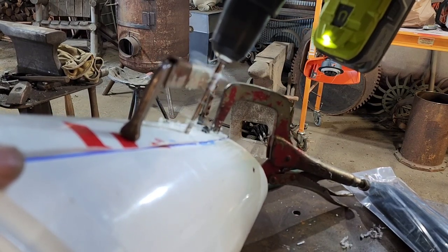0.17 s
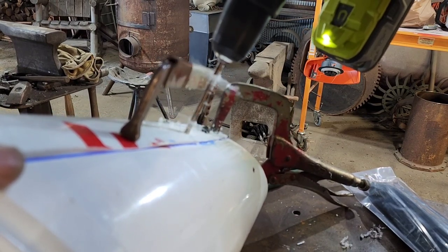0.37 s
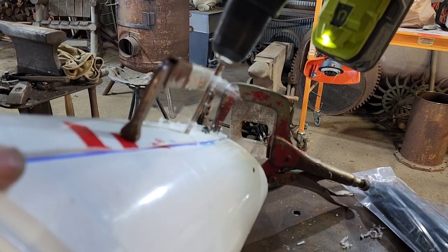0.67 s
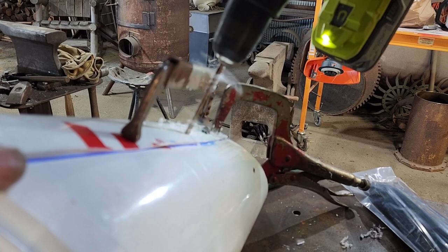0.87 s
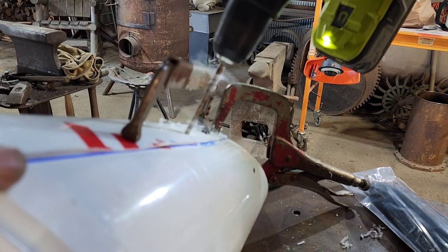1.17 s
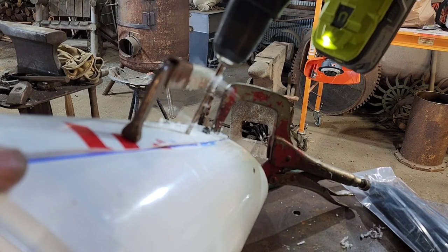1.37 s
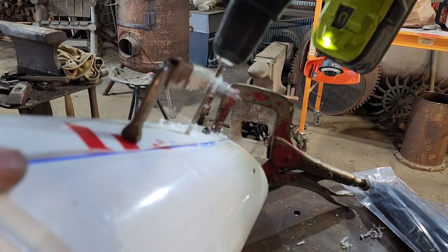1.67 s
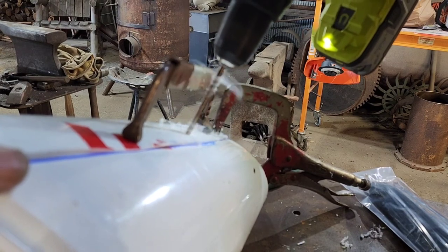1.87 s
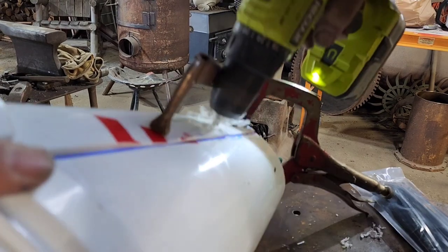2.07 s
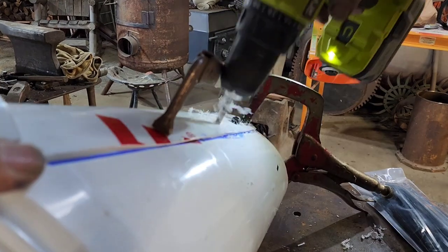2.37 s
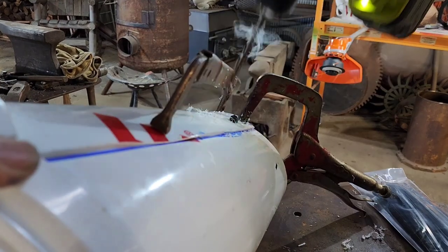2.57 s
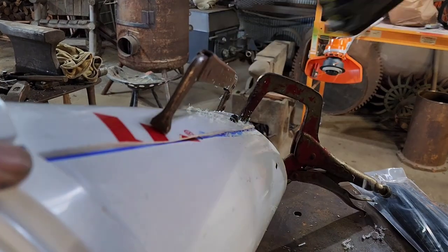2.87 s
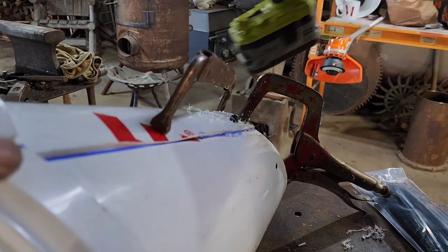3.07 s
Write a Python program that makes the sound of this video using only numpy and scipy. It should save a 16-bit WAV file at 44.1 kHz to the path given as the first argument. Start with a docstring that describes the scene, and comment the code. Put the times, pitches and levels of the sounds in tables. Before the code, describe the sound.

Drill motor hisses and whines steadily, rasps and squeals in plastic, then halts with a sharp knock.

```python
"""A cordless drill runs flat out in a workshop: pulsing motor hiss, gear whine, a rattle swelling once a turn.
At about 2.1 s the bit pushes through a hollow plastic shell; the chuck bumps, rubs and squeals, the whine sags.
From 2.55 s the flutes rasp and squeak as the bit is drawn out; at 2.8 s the spindle lock knocks to a stop.
The knock rings in the room, then a faint scuff. Lines are sines or narrow noise, the rest is coloured noise and modes."""
import sys
import numpy as np
from scipy import signal
from scipy.fft import rfft, irfft, next_fast_len
from scipy.io import wavfile
from scipy.ndimage import uniform_filter1d, map_coordinates

SR = 44100
rng = np.random.default_rng(int(sys.argv[2]) if len(sys.argv) > 2 else 0)


def waveform_to_disk(signal):
    """Save audio, clipped to [-1, 1], as 16-bit WAV at the path in sys.argv[1]."""
    frames = np.transpose(np.atleast_2d(signal))
    scaled = np.clip(frames, -1, 1) * 32767
    samples = np.round(scaled).astype(np.int16)
    wavfile.write(sys.argv[1], SR, samples)


N = 141120
WHINE_PER_TURN = 132  # whine cycles per spindle turn
STOP_S = 2.815

# gear train tones: (multiple of spindle speed [1])
GEAR_ORDERS = [1, 3, 6, 12, 13, 64.5, 72, 75, 90.5]
# plastic shell modes: (frequency [Hz], relative level [dB], t60 [s])
SHELL_MODES = [(268, -18, 0.03), (328, 1, 0.095), (360, 0, 0.09), (388, 1, 0.095), (452, -9, 0.05),
               (810, -11, 0.027), (1250, -6, .02), (1730, -10, 0.03)]


def amp(db):
    """Decibels to gain."""
    return 10 ** (np.asarray(db) / 20)


def unit(x):
    """Scaled to rms 1."""
    return x / np.sqrt(np.mean(x ** 2) + 1e-20)


def along(points, hz):
    """(Hz, value) points read on a log frequency axis."""
    f, v = np.transpose(points)
    return np.interp(np.log(hz + 1), np.log(f + 1), v)


def curve(rows, axis=1):
    """One column of a time table, sample by sample."""
    rows = np.array(rows)
    return np.interp(np.arange(N) / SR, rows[:, 0], rows[:, axis])


def wobble(rate_hz):
    """A smooth random curve, rate_hz knots a second."""
    return map_coordinates(rng.standard_normal(8192), [np.arange(N) * rate_hz / SR], mode="wrap")


def filtered(x, response):
    """x times a response of frequency."""
    m = next_fast_len(N + SR // 2)
    return irfft(rfft(x, m) * response(np.fft.rfftfreq(m, 1 / SR)), m)[..., :N]


def spread(pair, colour):
    """Two unrelated signals as coloured stereo of rms 1, mixed as mid and side."""
    # (frequency [Hz], left-right likeness [-1 to 1])
    likeness = [(60, 0.98), (250, 0.88), (500, 0.46), (1500, 0.4), (2500, 0.094), (5000, 0.12),
                (8000, -0.063), (14000, -0.085)]

    def mid_side_gains(hz):
        angle = np.arccos(np.clip(along(likeness, hz), -1, 1)) / 2
        return amp(along(colour, hz)) * np.array([np.cos(angle), np.sin(angle)])

    mid, side = filtered(pair, mid_side_gains)
    return unit(np.array([mid + side, mid - side]))


def noise():
    """Two unrelated white noises."""
    return rng.standard_normal((2, N))


def worn(turns, share, size=512):
    """Roughness of which a share repeats with every turn."""
    track = rng.standard_normal((2, size))
    again = np.array([map_coordinates(row, [turns % 1 * size], mode="grid-wrap") for row in track])
    share = np.clip(share, 0, 1)
    return np.sqrt(share * size * turns[-1] / N) * again + np.sqrt(1 - share) * noise()


def ring(modes, scatter_db, fuzz_hz):
    """One strike on a set of decaying modes, each blurred over fuzz_hz."""
    t = np.arange(SR // 3) / SR
    out = np.zeros(len(t))
    for hz, db, t60 in modes:
        level = amp(db + scatter_db * rng.normal() - 60 * t / t60)
        blur = np.sqrt(2 * np.pi * fuzz_hz / SR) * np.cumsum(rng.standard_normal(len(t)))
        out += level * np.cos(2 * np.pi * hz * t + blur)
    return out


def add(out, s, sound):
    """Mix a sound in at a time."""
    part = out[..., round(s * SR):][..., :sound.shape[-1]]
    part += sound[..., :part.shape[-1]]


def tone(cycles, drift, apart):
    """A slightly unsteady line of rms 1 with its own phase in each ear."""
    phase = 2 * np.pi * cycles + drift * wobble(24.94)
    return np.sqrt(2) * np.sin([phase + apart, phase - apart])


def narrow(cycles, width_hz):
    """A fuzzy line of rms 1: noise in a narrow band, unrelated between the ears."""
    blur = np.array([wobble(width_hz) + 1j * wobble(width_hz) for ear in range(2)])
    return unit((blur * np.exp(2j * np.pi * cycles)).real)


def air():
    """The quiet air of the room: steady coloured noise."""
    # (frequency [Hz], relative level [dB per Hz])
    colour = [(25, -10.5), (130, 1), (450, -10.5), (850, -18), (1800, -21), (5000, -24), (12000, -38.5)]
    return amp(-57) * spread(noise(), colour)


def workshop(x):
    """The room's tail: decaying noise, each frequency dying at its own speed."""
    # (frequency [Hz], t60 [s])
    decay = [(100, 0.17), (400, 0.47), (2000, 0.39), (6000, 0.34), (15000, 0.29)]
    hz, t, z = signal.stft(rng.standard_normal((2, SR * 2 // 3)), SR, nperseg=256)
    z = z * amp(-60 * t / along(decay, hz)[:, None])
    tail = signal.istft(z, SR, nperseg=256)[1]
    return signal.fftconvolve(x, tail / np.linalg.norm(tail[0]), axes=1)[:, :N]


def handling():
    """A faint scuff, noise with a rough level, as the drill is lifted away."""
    level_db = curve([(2.98, -86), (3.045, -50), (3.085, -56.5), (3.125, -73), (3.2, -76.5)])
    colour = [(60, -5.0), (300, 2.5), (700, -10), (1700, -6.5), (4000, -17), (12000, -25)]
    return amp(level_db) * spread(noise() * amp(3.1 * wobble(210)), colour)


def brake():
    """The spindle lock chatters, slams home and rebounds, ringing the chuck and jolting the shell."""
    # lock strikes: (time [s], relative level [dB])
    strikes = [(2.807, -13), (2.812, -13), (2.817, -13.5), (2.822, -17), (2.826, -8), (2.836, -25),
               (2.841, -22), (2.851, -22)]
    # chuck modes: (frequency [Hz], relative level [dB], t60 [s])
    chuck_modes = [(1580, -14, 0.035), (1760, -15, .04), (4215, -18, 0.025), (4780, -19, 0.025),
                   (5420, -14, 0.14), (5600, -17, .14), (6050, -22.5, .1), (6800, -25, 0.03),
                   (8376, -18, 0.03)]
    # jolted shell: (frequency [Hz], relative level [dB], t60 [s])
    thud_modes = [(60.5, -2.5, 0.18), (128, -3.5, 0.27), (282, -1.5, 0.33)]
    # (frequency [Hz], relative level [dB per Hz])
    crack_colour = [(200, -17), (1000, -21), (1700, 4.5), (2800, 2), (5500, 1.5), (8500, 4), (10500, -3.5),
                    (14000, 2.5)]
    crack_offset_db, chuck_offset_db, thud_db = 1.5, 1, -30
    cracks, rings, t = np.zeros((2, N)), np.zeros((2, N)), np.arange(SR // 10) / SR
    for s, db in strikes:
        add(cracks, s, amp(db + crack_offset_db - 60 * t / 0.018))
        chuck = np.array([ring(chuck_modes, scatter_db=3.0, fuzz_hz=160) for ear in range(2)])
        add(rings, s, amp(db + chuck_offset_db) * chuck)
    add(rings, STOP_S, amp(thud_db) * ring(thud_modes, scatter_db=6.5, fuzz_hz=7.1))
    return cracks * spread(noise(), crack_colour) + rings


def bumps():
    """Each bump of the chuck cracks briefly and rings the shell."""
    # (time [s], relative level [dB], crack re bump [dB])
    hits = [(2.087, -6, -7), (2.158, -6.5, -13), (2.166, -8.5, -14), (2.282, -11.5, -10), (2.32, -17, -14),
            (2.398, -18, -7), (2.429, -21, -7.5), (2.552, -14.5, -6), (2.571, -14, -6.5),
            (2.625, -23.5, -11), (2.679, -16.5, -5), (2.723, -16, -7.5)]
    # (frequency [Hz], relative level [dB per Hz])
    crack_colour = [(150, -13), (300, 3), (1200, -7.5), (2000, 1.5), (3000, -10), (12000, -34)]
    cracks, rings, t = np.zeros(N), np.zeros(N), np.arange(SR // 10) / SR
    for s, db, crack_db in hits:
        onset = 1 - np.exp(-t / 0.0009)
        add(cracks, s, amp(db + crack_db - 60 * t / 0.078) * onset)
        add(rings, s, amp(db - 12.5) * ring(SHELL_MODES, scatter_db=1, fuzz_hz=10))
    return cracks * spread(noise(), crack_colour) + rings


def slide(rows, width_hz):
    """A fuzzy friction tone gliding along (s, Hz, dB) rows."""
    return amp(curve(rows, axis=2)) * narrow(np.cumsum(curve(rows)) / SR, width_hz)


def squeal():
    """Friction tones: the chuck bearing down, the flutes sliding on the rim in rough bursts."""
    # chuck nose on plastic: (time [s], frequency [Hz], level [dB])
    chuck_rows = [(2.26, 1732, -50), (2.33, 1754, -27), (2.41, 1785, -25.5), (2.45, 1870, -26),
                  (2.5, 1830, -26), (2.54, 1880, -57)]
    # flutes on the rim, one list per squeak: (time [s], frequency [Hz], level before bursts [dB])
    squeak_rows = [
        [(2.18, 1000, -59), (2.205, 891, -27), (2.23, 806, -32.5), (2.3, 780, -39.5), (2.42, 790, -40.5),
         (2.5, 767, -59.5)],
        [(2.57, 884, -52), (2.6, 995, -32), (2.625, 1196, -29), (2.645, 1420, -28), (2.67, 1640, -28),
         (2.69, 1640, -58)],
        [(2.66, 1251, -47.5), (2.68, 1285, -27), (2.7, 1412, -20.5), (2.718, 1162, -21), (2.73, 1116, -31),
         (2.745, 1080, -70)],
    ]
    bursts = unit(amp(2 * wobble(200)))
    squeaks = sum(slide(rows, width_hz) for rows, width_hz in zip(squeak_rows, [70, 90, 260]))
    return slide(chuck_rows, width_hz=110) + bursts * squeaks


def rubbing():
    """The chuck presses on the plastic: rough noise over the chuck's own ring."""
    # (time [s], pressure [0-1])
    press = [(2.08, 0.37), (2.17, 0.5), (2.25, 0.36), (2.33, 0.92), (2.47, 0.77), (2.56, 0.44), (2.6, 0.04)]
    # (frequency [Hz], relative level [dB per Hz])
    colour = [(200, -7), (550, -22), (800, -3.5), (1200, -4), (1800, 2.5), (2500, 0), (3400, -15.5),
              (4200, 5.5), (5500, -6.5), (9000, -24), (15000, -34.5)]
    # chuck ring: (frequency [Hz], width [Hz], level at full pressure [dB])
    chuck_lines = [(4250, 450, -34), (5570, 130, -29.5), (8380, 200, -35.5)]
    rub = amp(-20.5) * spread(noise() * amp(4.6 * wobble(120)), colour)
    bite = sum(amp(db) * narrow(hz * np.arange(N) / SR, width_hz) for hz, width_hz, db in chuck_lines)
    return curve(press) * (rub + bite)


def shaking():
    """The shell shaken by the chuck: low noise."""
    # (time [s], level [dB])
    level_db = [(2.06, -82), (2.11, -35), (2.19, -23), (2.235, -37), (2.3, -30.5), (2.47, -33.5),
                (2.54, -42.5), (2.8, -49)]
    # (frequency [Hz], relative level [dB per Hz])
    colour = [(20, -19), (45, -12), (70, 5), (100, -1), (130, 7), (165, 0), (215, -11), (500, -31.5)]
    return amp(curve(level_db)) * spread(noise(), colour)


def rasp(turns):
    """The bit slips on the rim as each jaw comes round, and the shell wall chatters."""
    # flutes catching the rim: (time [s], strength [0-1])
    catch_rows = [(2.08, 0), (2.11, .3), (2.2, .35), (2.24, .12), (2.28, .5), (2.45, .65), (2.48, .35),
                  (2.545, .35), (2.555, 1), (2.728, 1), (2.74, .27), (2.8, .11)]
    jaws, rasp_db = 3, -18.8
    chatter_limit = .6  # how far the rim evens out the wall's swing (0-1)
    catch = curve(catch_rows)
    slips = np.diff(np.floor(jaws * turns + .24 * wobble(70)), prepend=0)
    grind = .03 * noise()
    shell = ring(SHELL_MODES, scatter_db=1, fuzz_hz=0)
    wall = unit(signal.fftconvolve(slips + grind, shell[None], axes=1)[:, :N])
    swing = np.abs(uniform_filter1d(wall ** 2, size=300, axis=1)) + .01
    chatter = unit(wall / swing ** (chatter_limit / 2))
    # a light touch grips once a turn
    stutter = amp(2.4 * np.clip(1.3 - catch, 0, 1) * np.sin(2 * np.pi * turns))
    return amp(rasp_db) * np.clip(catch, 0, 1) * stutter * chatter


def motor_hiss(turns):
    """Vent noise pulsing with the rotor; its colour shifts as the drill drops and turns its vents."""
    # (time [s], relative level [dB])
    level_db = [(0.0, -19), (0.6, -19), (2.14, -18), (2.22, -15.5), (2.3, -18.5), (2.35, -15.5), (2.8, -23)]
    # before and after the drop: (frequency [Hz], relative level [dB per Hz])
    colour, deep_colour = [(200, -36.5), (500, -6.5), (900, -9), (1150, -10.5), (2100, -0.5), (2550, -5),
                           (3300, -2.5), (3800, -1), (4500, -1), (5250, -.5), (6400, 3), (6950, 0.5),
                           (7600, 3), (8700, 0), (9300, -6), (9900, -10), (10600, -5), (11300, -7),
                           (12200, -1), (13000, -2.5), (15700, -1)], [(200, -39), (500, -13), (1150, -5.5), (2100, -1), (2700, -4.5),
                                         (3500, -2), (4500, 2), (6300, 2), (6950, 0.5), (7600, 3),
                                         (8800, 2), (9500, -2.5), (10800, -6), (11400, -3), (12200, -2.5),
                                         (13500, -3), (15300, -0.5)]
    # drill dropping through: (time [s], depth [0-1])
    plunge = [(2.0, 0), (2.15, 0.97)]
    pulse_db = 0.37 * np.sin(2 * np.pi * GEAR_ORDERS[2] * turns)
    grit = amp(1.13 * wobble(900) + 0.58 * wobble(60) + pulse_db)
    deep = np.clip(curve(plunge), 0, 1)
    vents = np.sqrt(1 - deep) * spread(noise() * grit, colour)
    vents += np.sqrt(deep) * spread(noise() * grit, deep_colour)
    return amp(curve(level_db) + 2.5) * vents


def binding(turns):
    """The gears bind at one place in each turn: a narrow bell, peak 1."""
    place_turn, width_turns = .635, .06
    offset = (turns - place_turn + .5) % 1 - .5
    return np.exp(-.5 * (offset / width_turns) ** 2)


def gear_rattle(bind):
    """Gear rattle: coloured noise swelling where the gears bind."""
    # (frequency [Hz], relative level [dB per Hz])
    colour = [(700, -45), (1100, -20.5), (1330, -3.5), (1500, -3.5), (1660, -6), (1850, -6), (2200, -20),
              (3000, -19)]
    swell_db = 1.5
    return amp(-26) * unit(amp(swell_db * bind) * spread(noise(), colour))


def gear_rumble(turns):
    """Low roughness, partly repeating with every turn."""
    # (frequency [Hz], relative level [dB per Hz])
    colour = [(20, -10), (45, -23), (100, -15.5), (150, -15), (220, -8), (290, 2), (370, 2.5), (480, -1),
              (560, -5.5), (800, -5), (1300, -31)]
    return amp(-35.5) * spread(worn(turns, share=0.66), colour)


def gear_tones(turns):
    """Gear train lines, and rough ones of the motor and first gear stage."""
    # one per gear order: (level before the cut [dB])
    tone_db = [-59, -57, -54, -53, -47, -45, -43, -41, -46]
    # rough lines: (multiple of spindle speed [1], width [Hz], level before the cut [dB])
    ridge_rows = [(181.5, 90, -40), (204.3, 150, -34.5), (240, 100, -39), (252, 60, -41), (257.8, 50, -37),
                  (286.8, 150, -33), (348, 130, -36), (533, 300, -38)]
    tones = sum(amp(db) * tone(k * turns, drift=0.62, apart=0.32) for k, db in zip(GEAR_ORDERS, tone_db))
    return tones + sum(amp(db) * narrow(k * turns, width_hz) for k, width_hz, db in ridge_rows)


def gear_sing(turns, bind):
    """One gear binds and sings once a turn, unevenly."""
    # (time [s], relative level [dB])
    level_db = [(0, -42), (.4, -38.5), (.6, -35.5), (1, -33.5), (1.7, -34.5), (1.9, -39), (2.2, -42)]
    bursts = unit(bind * amp(1.8 * wobble(23)))
    return amp(curve(level_db)) * bursts * tone(GEAR_ORDERS[6] * turns, drift=.4, apart=.3)


def gear_whine(turns):
    """Gear mesh: an unsteady line with a fuzzy skirt, stronger at the left."""
    # (time [s], relative level [dB])
    level_db = [(0, -33), (.5, -31.7), (1.7, -32.7), (2.1, -31), (2.2, -26.5), (2.32, -28), (2.4, -26.5),
                (2.56, -28), (2.64, -44.5)]
    ear_db = np.array([[1], [-7]])
    cycles = WHINE_PER_TURN * turns
    line = tone(cycles + .05 * wobble(220), drift=.4, apart=.5)
    return amp(curve(level_db) + ear_db) * unit(line + .5 * narrow(cycles, 130))


def drill(turns):
    """The motor and gear train; in the cut the gears follow one shared level, hiss and whine their own."""
    bind = binding(turns)
    in_cut = amp(curve([(2, 1), (2.2, 0.5), (2.5, 0.5), (2.75, -7.5)]))  # (s, dB)
    gears = gear_rattle(bind) + gear_rumble(turns) + gear_tones(turns) + gear_sing(turns, bind)
    return motor_hiss(turns) + in_cut * gears + gear_whine(turns)


def running():
    """Full while the trigger is held, then cut short by the brake."""
    stop_db_per_s = 895.5
    return amp(-stop_db_per_s * np.maximum(np.arange(N) / SR - STOP_S, 0))


def scene():
    """Drill, shell and brake in the room, over its quiet air."""
    # gear whine pitch, which sets the spindle speed: (time [s], frequency [Hz])
    whine_pitch = [(0, 3062), (.5, 3052), (1.3, 3054), (1.7, 3048), (1.82, 3034), (1.95, 3048), (2.1, 2997),
                   (2.22, 2940), (2.4, 2989), (2.48, 2978), (2.6, 3045)]
    # (frequency [Hz], left minus right [dB])
    balance_db = [(60, 3), (99, -1.5), (160, 2), (270, -2), (450, -4), (740, 1), (1220, 2.5), (2010, 3),
                  (3330, 3.5), (5500, 1), (9080, 2), (15000, 5)]
    turns = np.cumsum(curve(whine_pitch)) / SR / WHINE_PER_TURN
    driven = drill(turns) + rubbing() + shaking() + rasp(turns) + squeal()
    direct = running() * driven + bumps() + brake() + handling()
    direct = filtered(direct, lambda hz: amp(along(balance_db, hz) * np.array([[.5], [-.5]])))
    return direct + amp(-7) * workshop(direct) + air()


def record(dry):
    """Nothing is kept above the band limit; a smooth edge leads up to it."""
    top_hz, edge_hz = 15760, 180
    return filtered(dry, lambda hz: np.sin(np.pi / 2 * np.clip((top_hz - hz) / edge_hz + .5, 0, 1)) ** 2)


dry = scene()
out = record(dry)
waveform_to_disk(out)
```